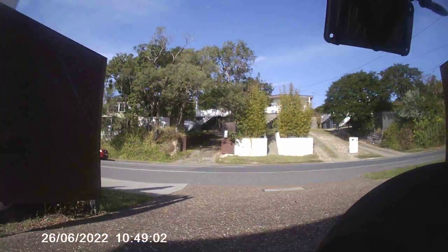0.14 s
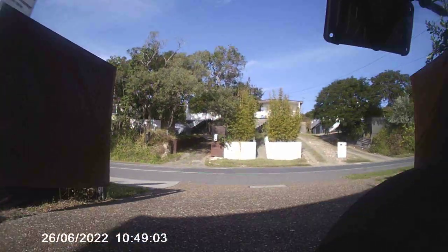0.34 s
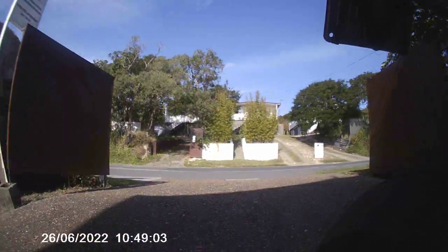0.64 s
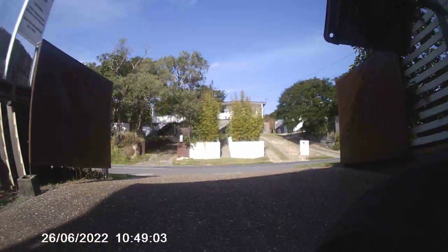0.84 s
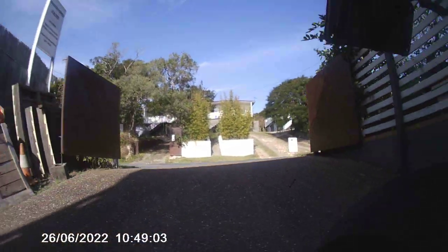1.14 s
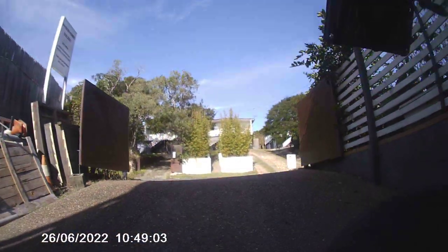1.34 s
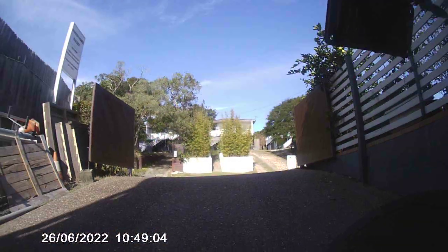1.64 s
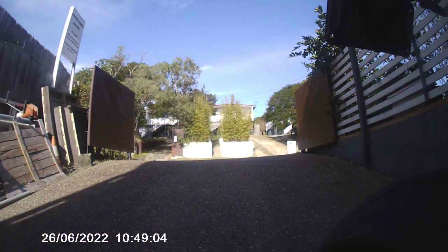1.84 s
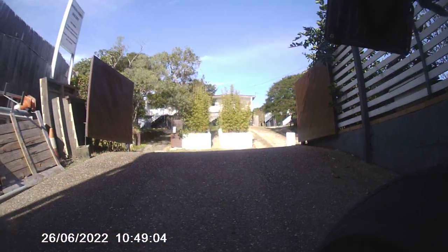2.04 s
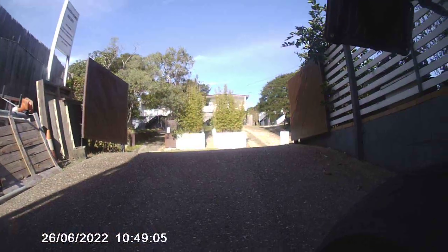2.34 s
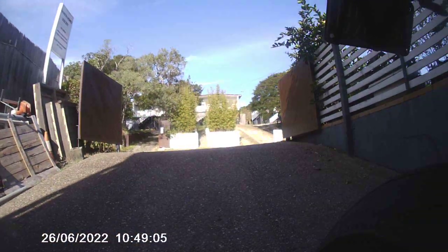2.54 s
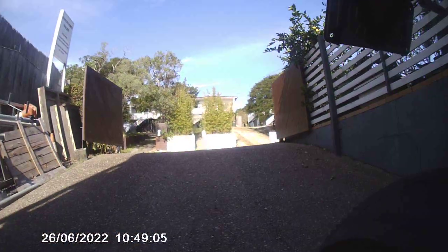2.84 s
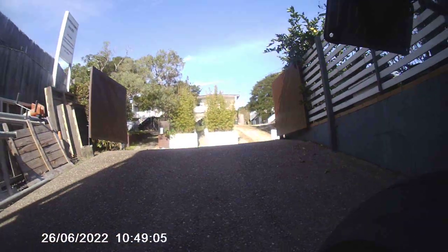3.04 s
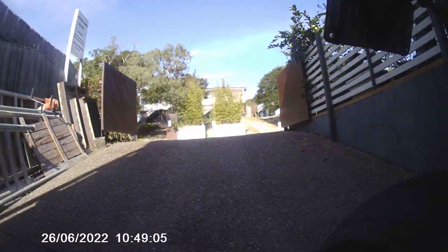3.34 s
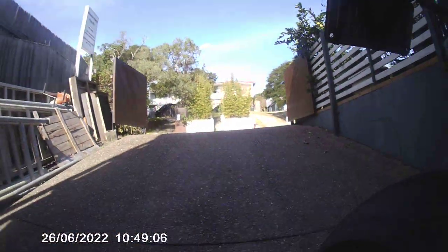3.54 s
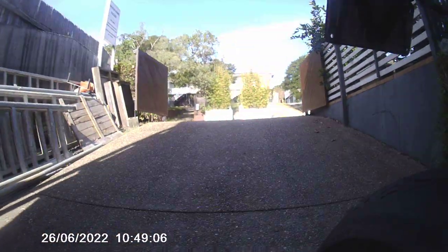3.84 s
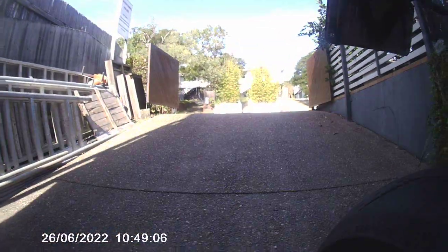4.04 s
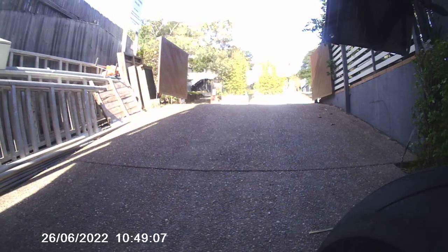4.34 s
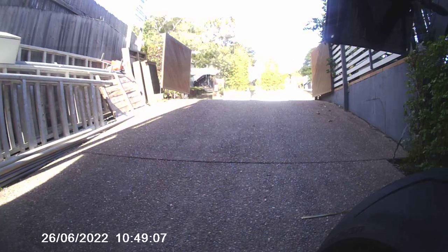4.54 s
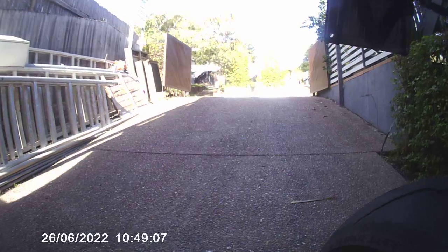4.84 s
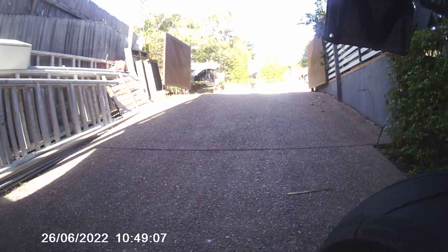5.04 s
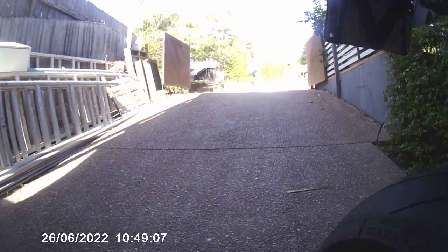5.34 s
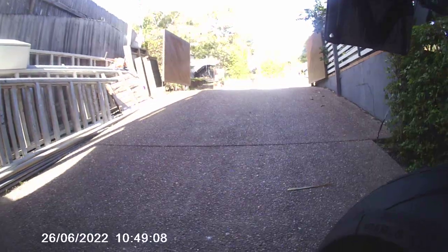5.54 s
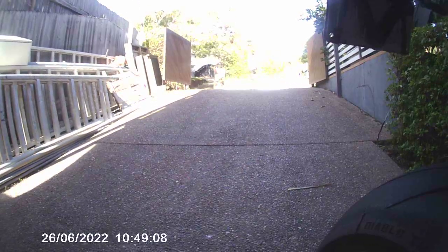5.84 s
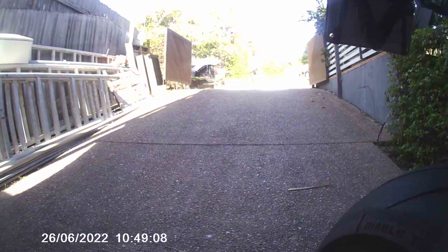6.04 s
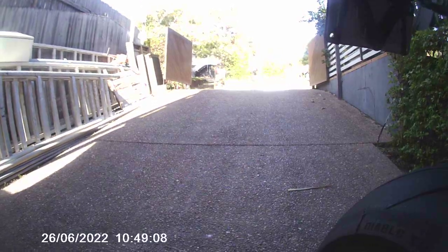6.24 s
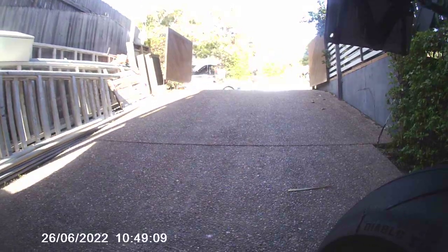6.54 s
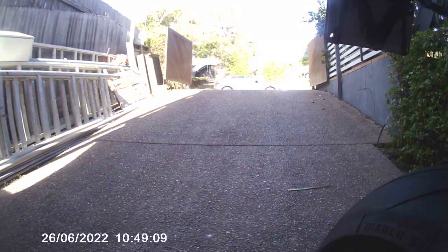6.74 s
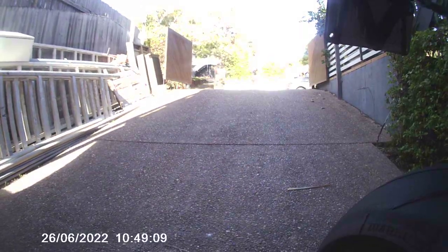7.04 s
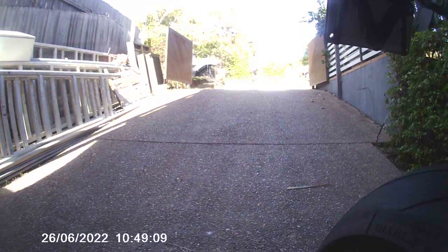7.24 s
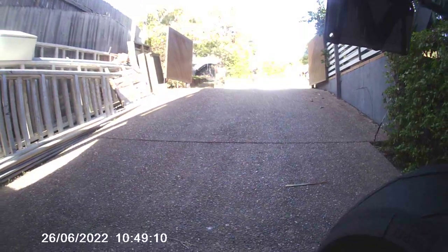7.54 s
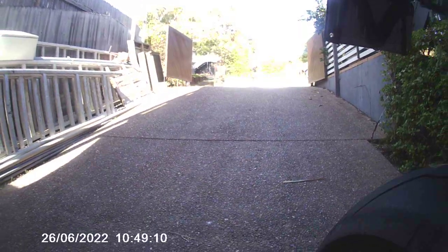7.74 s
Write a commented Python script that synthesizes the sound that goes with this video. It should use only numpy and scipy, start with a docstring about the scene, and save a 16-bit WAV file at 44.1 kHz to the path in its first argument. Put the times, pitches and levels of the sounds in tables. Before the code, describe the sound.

Loud, lumpy open-pipe motorcycle idle, low and buzzing with overload, stumbling on occasional weak beats over ticking valves and chain rustle.

```python
"""A hard, rasping, uneven boom: an unsilenced twin-cylinder motorcycle idles between two fences.
Each cylinder's puffs ring its own open pipe; weak or missed second beats sag the crank and rattle the drive.
Valve ticks ring the head over rustling chain and gears, and the fences return a short, diffuse echo.
A camera mounted on the bike is overloaded by the beats, which squares the boom off into the rasp."""
import sys
import numpy as np
from scipy import signal
from scipy.fft import rfft, irfft, next_fast_len
from scipy.io import wavfile
from scipy.ndimage import uniform_filter1d

SR = 44100
rng = np.random.default_rng(int(sys.argv[2]) if len(sys.argv) > 2 else 0)


def int16_out(signal):
    """Quantize to a 16-bit WAV file."""
    q = np.round(np.clip(np.atleast_2d(signal).T, -1, 1) * 32767)
    wavfile.write(sys.argv[1], SR, q.astype(np.int16))


N = 348371

# points in the four-stroke cycle, as shares of it: where the sound starts, where the second cylinder fires
START_PHASE, SECOND_PHASE = 0.415, 0.495


def undb(db):
    """Decibels to gain."""
    return 10 ** (np.asarray(db) / 20)


def level(x, db):
    """Set the rms level."""
    return x * undb(db) / np.sqrt(np.mean(x ** 2))


def curve(table, axis=1):
    """One column of a table, joined by straight lines in time."""
    rows = np.array(table)
    return np.interp(np.arange(N) / SR, rows[:, 0], rows[:, axis])


def colour(x, points):
    """Filter by a spectrum of (frequency [Hz], level [dB]) points, joined along log frequency."""
    hz, db = np.transpose(points)
    size = next_fast_len(N + 4096)
    f = np.maximum(np.arange(size // 2 + 1) * SR / size, 1)
    gain = undb(np.interp(np.log(f), np.log(hz), db))
    return irfft(rfft(x, size) * gain, size)[:N]


def resonance(x, hz, width):
    """Two-pole band-pass, gain 1 at the centre."""
    b, a = signal.iirpeak(hz, hz / width, fs=SR)
    return signal.lfilter(b, a, x)


def ring(x, modes):
    """Sum of resonances, all driven by the same signal."""
    return sum(gain * resonance(x, hz, width) for hz, width, gain in modes)


def crank_times(phase, share):
    """The moments at which the engine passes one point of its cycle [s]."""
    turns = np.arange(np.ceil(phase[0] - share), phase[-1] - share) + share
    return np.interp(turns, phase, np.arange(N) / SR)


def impulses(times, db, scatter_db, jitter_s):
    """One impulse per time, each a little different in size and timing."""
    chance = rng.standard_normal((len(times), 2))
    jittered = times + jitter_s * chance[:, 0]
    at = np.clip(jittered * SR, 0, N - 1).astype(int)
    return np.bincount(at, undb(db + scatter_db * chance[:, 1]), N)


def fade(x, decay_s):
    """Give every impulse an exponential tail."""
    return signal.lfilter([1], [1, -np.exp(-1 / (decay_s * SR))], x)


def walk(rate):
    """Random levels held 1 / rate seconds and slewed twice; spread near 1."""
    hold = int(SR / rate)
    held = rng.standard_normal(400)[np.arange(N) // hold]
    return 1.3 * uniform_filter1d(uniform_filter1d(held, hold), hold)


def fences(x, db, decay_s):
    """The fences on both sides throw back a diffuse echo: decaying noise that starts 12 ms late."""
    t = np.arange(SR // 4) / SR
    echo = rng.standard_normal(len(t)) * np.exp(-t / decay_s) * (t > 0.012)
    return level(signal.fftconvolve(x, echo)[:N], db)


# colour of the crankcase and cam chain noise: (frequency [Hz], relative level [dB])
CASE_COLOUR = [(100, 11.5), (400, 10), (780, -13), (1050, -6), (1400, 0), (1750, -3.5), (2100, -11),
               (2420, -22), (2850, -13.5), (3300, -14.5), (4500, -17.5), (5800, -23), (6500, -35.5),
               (11000, -58.5)]
# valves closing: (share of the cycle [0-1], relative level [dB])
VALVE_TICKS = [(0.031, 3), (0.268, -4.5), (0.618, 1), (0.758, -19.5)]
# ring of the cylinder head: (frequency [Hz], width [Hz], relative gain [signed factor])
HEAD_MODES = [(983, 140, 0.92), (1365, 69, -1.5), (1740, 85, 0.99), (2046, 64, -0.19), (2874, 23, 0.46),
              (3580, 73, 0.32), (4320, 65, 0.21), (4560, 51, -0.36), (5700, 44, 0.13)]


def clatter(phase):
    """Valves tick on the head; chain and gears rustle in the case, louder after each tick."""
    ticks = np.zeros(N)
    for share, db in VALVE_TICKS:
        ticks += impulses(crank_times(phase, share), db, scatter_db=1.1, jitter_s=0.0007)
    tick_noise = fade(ticks, decay_s=0.0038) * rng.standard_normal(N)
    head = ring(tick_noise, HEAD_MODES)
    rustle = (1 + fade(ticks, decay_s=0.008)) * rng.standard_normal(N)
    case = colour(rustle, CASE_COLOUR)
    return level(head, -30.0) + level(case, -21.5)


# rattle of the drive in its slack: centre and width of each of two band-passes, decay
SLACK_HZ, SLACK_WIDTH_HZ, SLACK_DECAY_S = 1540, 450, 0.0061
SLACK_DB = -8.5  # mean impulse level for a full misfire, ahead of the band-passes


def slack(phase):
    """A missed beat lets the drive rattle in its slack: a noise burst, louder the more push is missing."""
    second = crank_times(phase, SECOND_PHASE)
    missed = np.array([second[np.argmin(abs(second - s))] for s, db in MISFIRES])
    missing_db = 20 * np.log10(1 - undb([db for s, db in MISFIRES]))
    knocks = impulses(missed + 0.0019, SLACK_DB + missing_db, scatter_db=2.5, jitter_s=0.00092)
    burst = fade(knocks, SLACK_DECAY_S) * rng.standard_normal(N)
    narrowed = resonance(burst, SLACK_HZ, SLACK_WIDTH_HZ)
    return resonance(narrowed, SLACK_HZ, SLACK_WIDTH_HZ)


# a full misfire costs this much speed [cycles/s], from SAG_LEAD_S before the missed beat, deepest SAG_S later
SAG_HZ, SAG_LEAD_S, SAG_S = 1.98, 0.025, 0.03
# idle speed while both cylinders fire: (time [s], speed [four-stroke cycles/s])
IDLE_SPEED = [(0.0, 21.679), (1.16, 21.293), (1.29, 22.309), (1.66, 19.923), (1.78, 21.736), (2.24, 23.102),
              (2.63, 22.144), (2.76, 24.172), (3.0, 24.405), (4.05, 21.787), (4.31, 22.926), (4.73, 21.948),
              (5.12, 22.53), (5.9, 21.478), (6.53, 22.04), (7.23, 19.51), (7.61, 20.574), (7.9, 17.692)]


def crank_speed():
    """Each misfire lets the crank sag by the share of push that is missing, then it recovers."""
    t = np.arange(N) / SR
    speed = curve(IDLE_SPEED)
    for s, db in MISFIRES:
        age = np.maximum(t - s + SAG_LEAD_S, 0) / SAG_S
        missing = 1 - undb(db)
        speed = speed - SAG_HZ * missing * age * np.exp(1 - age)
    return speed


def exhaust(firings, pipe, puff_s):
    """Rounded puffs, each trailed by turbulent gas, ring the pipe; its mouth radiates the low middle."""
    lag = np.arange(-200, 201) / SR
    puff = signal.fftconvolve(firings, np.exp(-0.5 * (lag / puff_s) ** 2), "same")
    gas = 0.2 * fade(firings, decay_s=0.011) * rng.standard_normal(N)
    return resonance(ring(puff + gas, pipe), hz=223.7, width=121.0)


# second cylinder: spread of its burns, and how far a strong burn weakens the next one (0-1)
BURN_SCATTER_DB, BURN_REBOUND = 1.55, 0.61
# weak or missed firings of the second cylinder: (time [s], level [dB])
MISFIRES = [(0.146, -15.5), (1.128, -3), (1.316, -14.5), (1.703, -4.5), (1.982, -4), (2.119, -5),
            (2.164, -10.5), (2.345, -29.5), (2.79, -14), (2.961, -13), (3.129, -4.5), (3.955, -3.5),
            (4.674, -7.5), (6.499, -8), (7.775, -2.5)]
# exhaust pipe resonances: (frequency [Hz], width [Hz], relative gain [factor; sign is the sense of the swing])
FIRST_PIPE_MODES = [(57, 44.2, 0.58), (170.7, 17, -0.048), (206.84, 56.6, -0.84), (239.6, 31.6, 0.71),
                    (341.3, 16, 0.205), (462, 7.7, 0.24)]
SECOND_PIPE_MODES = [(49.9, 16.3, 1), (133, 13, -0.18), (186.5, 25, 0.15), (201.9, 83, -0.67),
                     (264.6, 65.4, 0.46), (497, 96, 0.11)]


def cylinders(phase):
    """A steadier first beat and a second that tends to alternate strong and weak, each in its own pipe."""
    first, second = crank_times(phase, 0), crank_times(phase, SECOND_PHASE)
    steady_gain = np.sqrt(1 - BURN_REBOUND ** 2)
    uneven = signal.lfilter([steady_gain], [1, BURN_REBOUND], rng.standard_normal(len(second)))
    burn_db = BURN_SCATTER_DB * uneven
    for s, db in MISFIRES:
        burn_db[np.argmin(abs(second - s))] = db
    lead = impulses(first, 0, scatter_db=1.02, jitter_s=0.00008)
    follow = impulses(second, burn_db, scatter_db=0.27, jitter_s=0.00031)
    first_beat = exhaust(lead, FIRST_PIPE_MODES, puff_s=0.00058)
    second_beat = exhaust(follow, SECOND_PIPE_MODES, puff_s=0.00063)
    return first_beat + second_beat


IDLE_RATE = 22  # speed at which boom, thud and clatter keep their set balance [cycles/s]
# the crank runs a little early or late: spread in cycles, changes per second
FLUTTER_CYCLES, FLUTTER_RATE = 0.016, 12
# the deep thud thins as the engine speeds up: below this pitch, dB per cycle per second
THUD_HZ, THUD_DB_PER_HZ = 112, -1.0


def scene(boom_db=-0.5, boom_db_per_hz=0.72, clatter_db_per_hz=0.15):
    """Exhaust and clatter share one crankshaft; both grow with engine speed, while the thud thins."""
    speed = crank_speed()
    phase = START_PHASE + np.cumsum(speed) / SR + FLUTTER_CYCLES * walk(FLUTTER_RATE)
    surplus = uniform_filter1d(speed, size=SR // 3) - IDLE_RATE
    boom = level(cylinders(phase), boom_db) * undb(boom_db_per_hz * surplus)
    low_pass = signal.butter(2, THUD_HZ, fs=SR, output="sos")
    thud = signal.sosfiltfilt(low_pass, boom)
    boom = boom + thud * (undb(THUD_DB_PER_HZ * surplus) - 1)
    rattle = clatter(phase) * undb(clatter_db_per_hz * surplus) + slack(phase)
    echo = fences(boom, db=-19.0, decay_s=0.019)
    return (boom + echo + rattle)[None]


TOP_HZ = 15800  # nothing sounds above this frequency
# response after the overloaded input: (frequency [Hz], level [dB])
RECORDER_RESPONSE = [(3000, 0.5), (7000, 0), (10900, -0.5), (12500, -14), (15500, -16.5)]


def record(dry, bias=0.12, ceiling=0.67):
    """The input sits off centre and clips hard; the treble is then rolled off and ends at TOP_HZ."""
    clipped = np.clip(dry[0] + bias, -ceiling, ceiling)
    squared = colour(clipped, RECORDER_RESPONSE)
    steep_low_pass = signal.ellip(8, 0.02, 70, TOP_HZ, fs=SR, output="sos")
    return signal.sosfilt(steep_low_pass, squared)[None]


dry = scene()
out = record(dry)
int16_out(out)
```